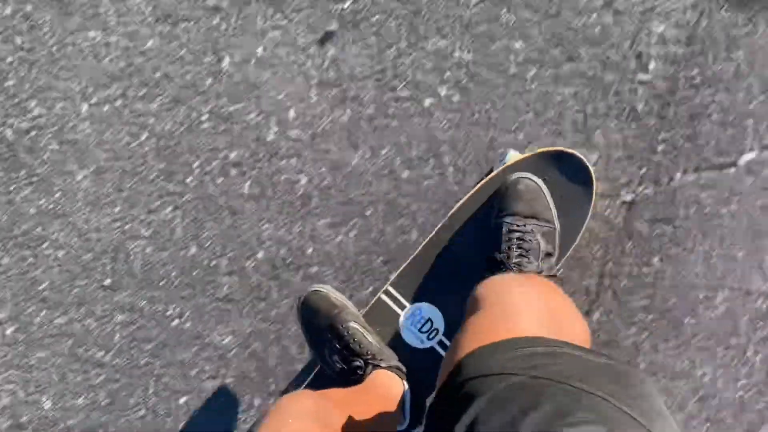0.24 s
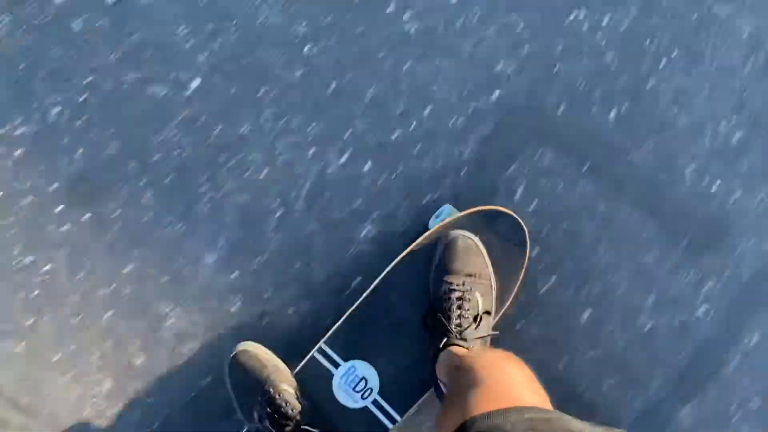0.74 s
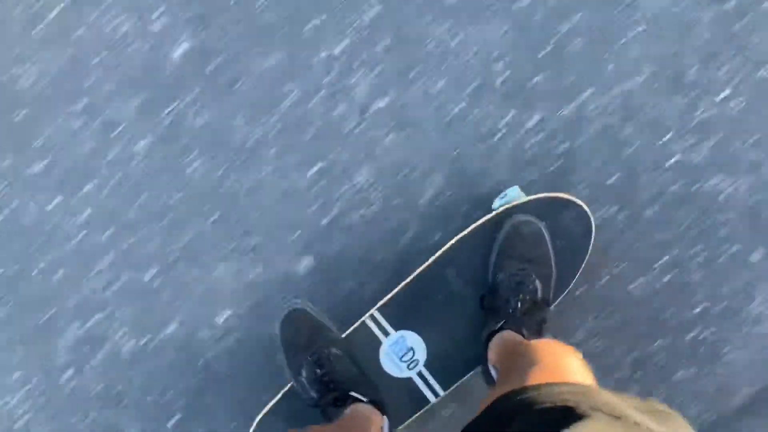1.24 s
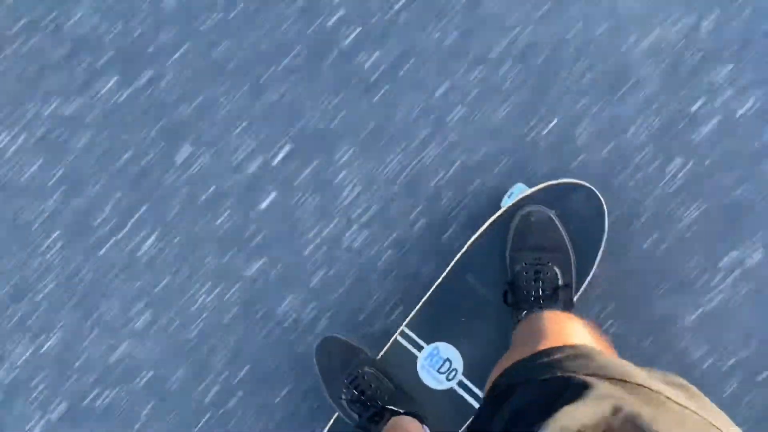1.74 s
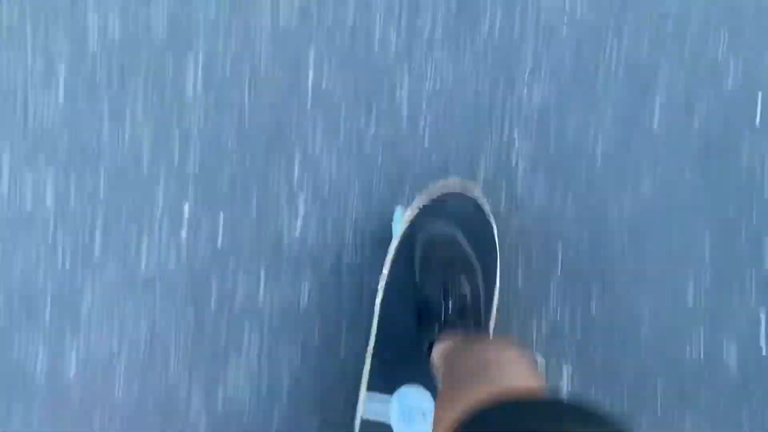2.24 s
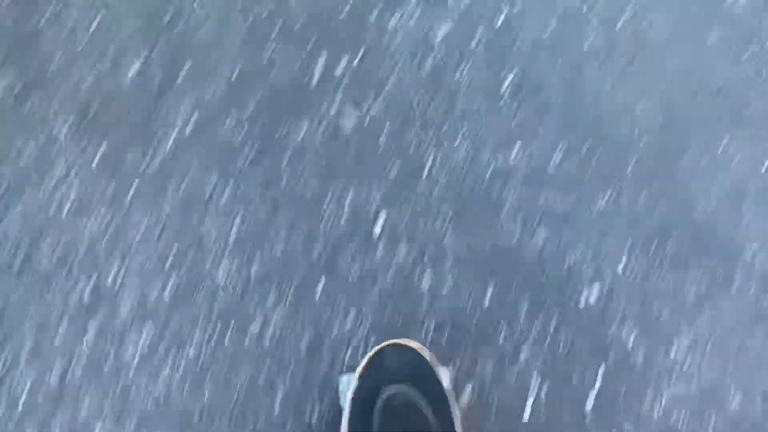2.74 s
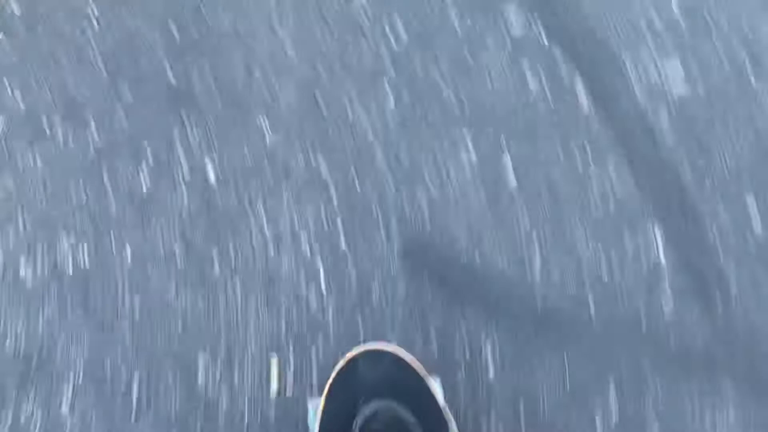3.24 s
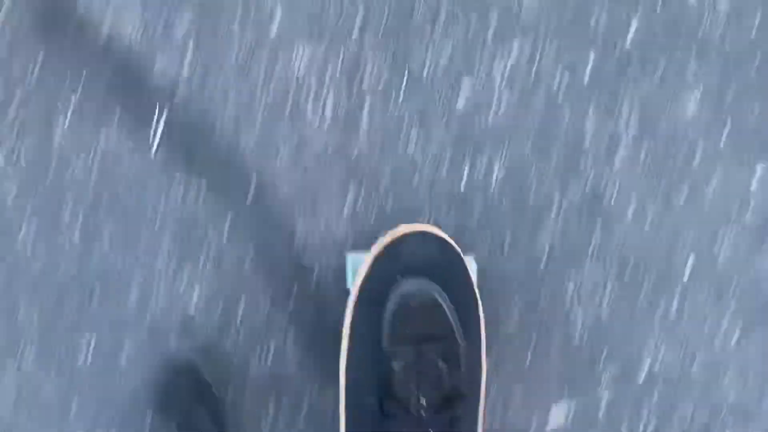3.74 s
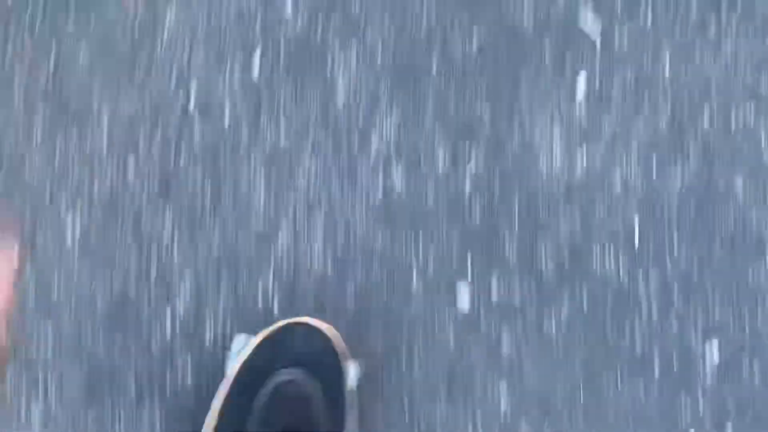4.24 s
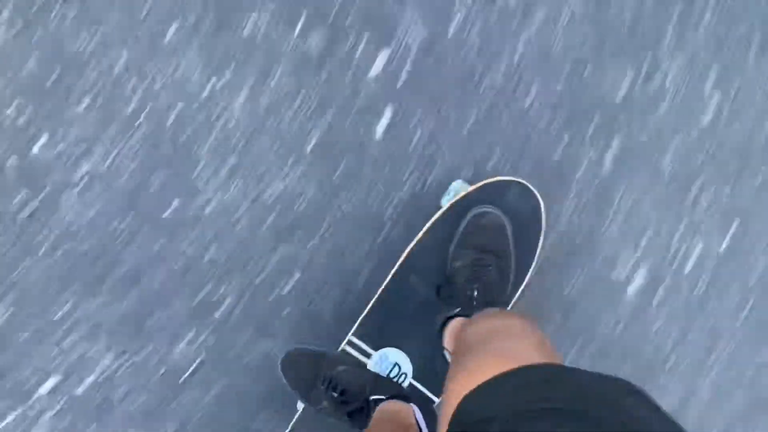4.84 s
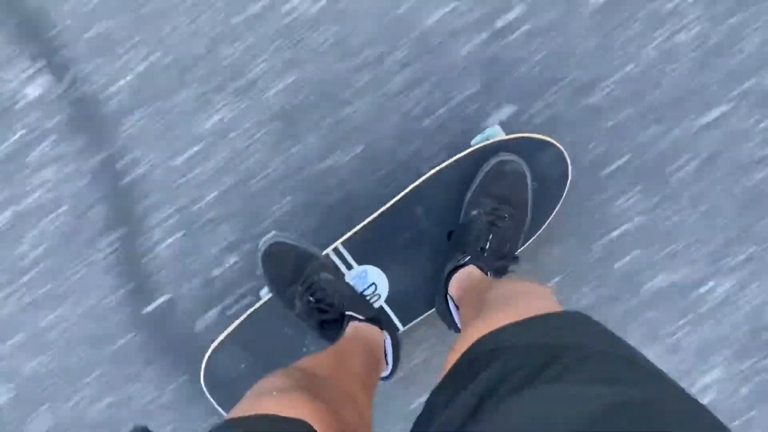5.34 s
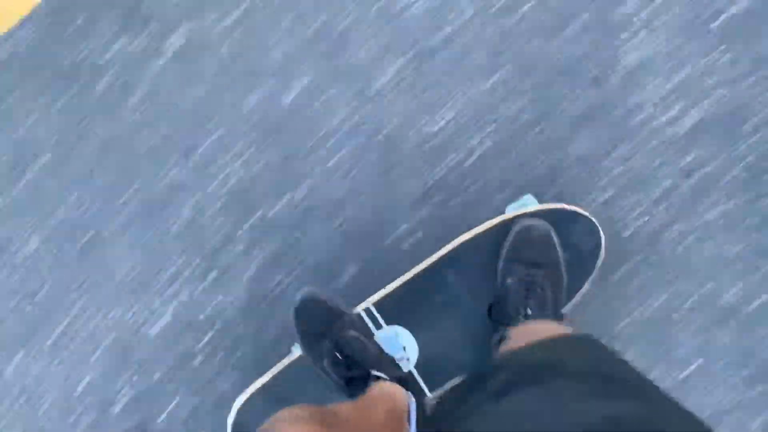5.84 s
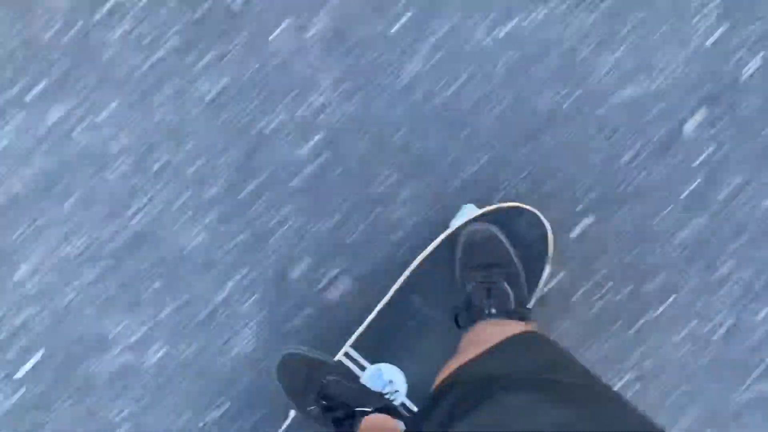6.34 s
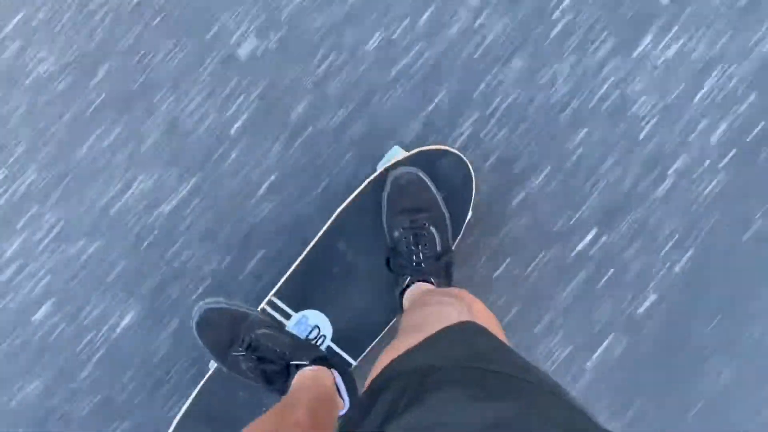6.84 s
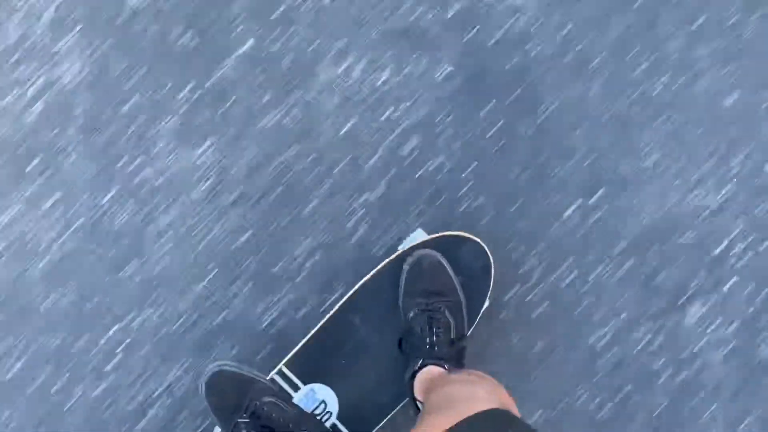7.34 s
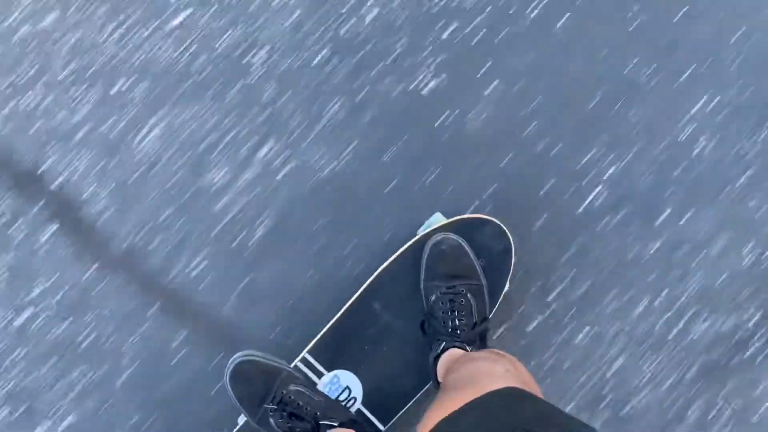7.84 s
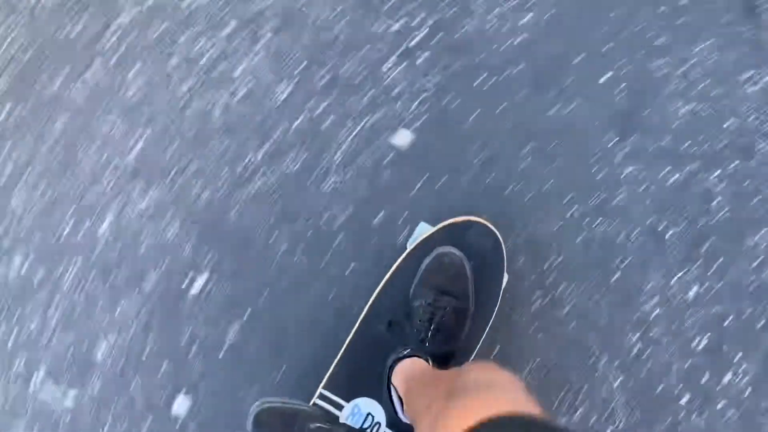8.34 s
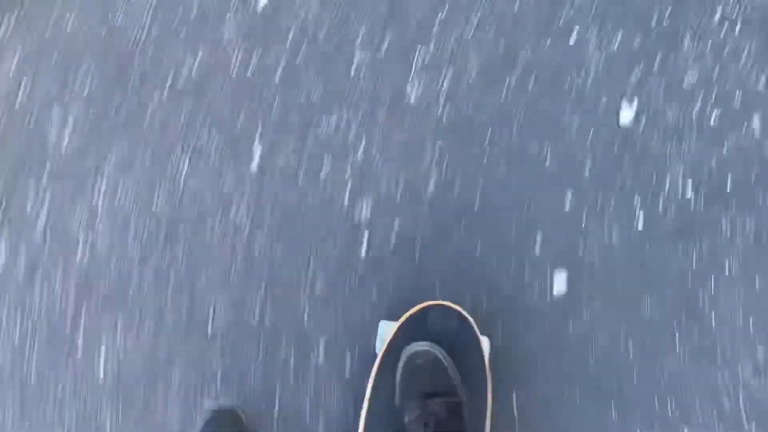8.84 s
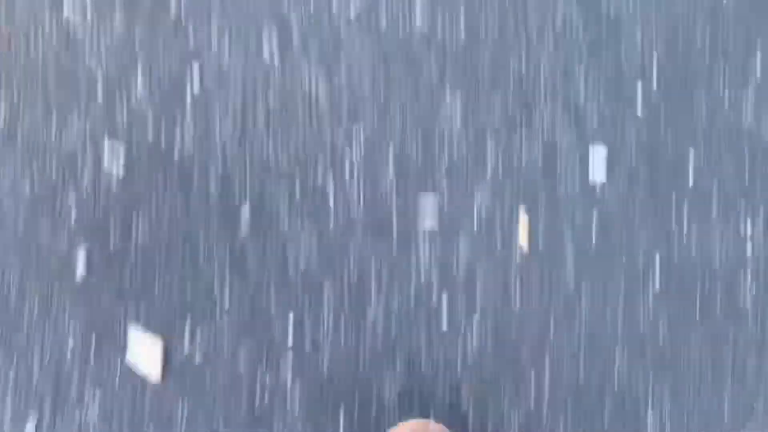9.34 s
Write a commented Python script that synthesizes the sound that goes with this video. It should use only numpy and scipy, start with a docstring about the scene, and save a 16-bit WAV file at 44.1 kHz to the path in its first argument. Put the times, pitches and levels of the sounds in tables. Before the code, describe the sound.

Skateboard wheels rumble and crackle over rough asphalt, with hollow woody knocks at cracks, shoe scrapes during pushes, and light wind buffeting close up.

```python
"""Longboard on rough asphalt

A longboard rolls over rough asphalt, heard at a two-port microphone in the rider's hand. Road stones drive the
resonances of deck and wheels and click under the tread; cracks, pebbles and a foot knock, and a shoe scrapes
the road. These are shaped noise and damped sines. Low-frequency noise makes the air's buffeting, higher noise
its hiss, and gliding sines a low drone that comes and goes."""
import sys
import numpy as np
from scipy import signal
from scipy.fft import rfft, irfft, next_fast_len
from scipy.io import wavfile
from scipy.ndimage import uniform_filter1d, map_coordinates

SR = 44100
rng = np.random.default_rng(int(sys.argv[2]) if len(sys.argv) > 2 else 0)


def transcribe(u):
    """Save the signal u as a 16-bit wav file named by the first command-line argument.

    u: samples, shape (n,) or (channels, n), limited to [-1, 1]; the rate is SR.
    q: integer samples, one column per channel.
    """
    v = np.clip(np.atleast_2d(u).T, -1, 1)
    q = np.round(v * 32767).astype(np.int16)
    wavfile.write(sys.argv[1], SR, q)


N = 422478

# Spectrum of the low road rumble. Each row: frequency in Hz, relative density in dB per Hz.
RUMBLE_SPECTRUM = [(30, -28), (70, -18.5), (130, -2), (220, 1), (330, 0.5), (460, -2), (720, -9.5),
                   (850, -26.5), (1100, -25.5), (1600, -37.5), (4000, -40.5), (16000, -100)]
# Spectrum of the grit's crackle. Each row: frequency in Hz, relative density in dB per Hz.
GRIT_SPECTRUM = [(300, -53), (800, 5), (1300, 3.5), (1700, 4), (1930, 0.5), (2100, 6), (2700, 4.5),
                 (3400, -2.5), (4000, -3), (5000, -20), (9000, -26.5), (16000, -92)]
# Spectrum of the fine grit in the treble. Each row: frequency in Hz, relative density in dB per Hz.
FINE_SPECTRUM = [(1000, -76), (3000, 6), (4400, 3), (5600, 6), (6400, 3.5), (6850, 6.5), (7700, 1.5),
                 (9000, 0.5), (10100, 3.5), (10900, -5), (12400, -2), (14300, -7), (16000, -3)]
# Spectrum of rubbing, also of the woody rattle. Each row: frequency in Hz, relative density in dB per Hz.
SCRAPE_SPECTRUM = [(200, -30), (500, -6), (730, 13.5), (860, -0.5), (1050, 5.5), (1300, -0.5), (1700, 0),
                   (1930, -8.5), (2060, -5), (2300, -5.5), (3500, -18), (7000, -19.5), (16000, -31.5)]


def amp(db):
    """The decibel law: level in dB to amplitude ratio."""
    return np.exp(np.asarray(db) * (np.log(10) / 20))


def unit(x):
    """Normalisation by mean power: scale to rms 1."""
    return x / np.sqrt(np.mean(x ** 2) + 1e-20)


def along(points, hz):
    """Interpolation of (Hz, value) points on a logarithmic frequency axis."""
    f, v = np.transpose(points)
    return np.interp(np.log(hz + 1), np.log(f + 1), v)


def curves(rows):
    """Linear interpolation in time: one value per sample for each column after the time."""
    s, *cols = np.transpose(rows)
    return [np.interp(np.arange(N) / SR, s, c) for c in cols]


def wobble(rate):
    """Slow random modulation: a smooth curve through normal random knots, rate of them a second."""
    coarse = np.arange(0, N, 64)
    knots = rng.standard_normal(int(N * rate / SR) + 4)
    smooth = map_coordinates(knots, [coarse * rate / SR])
    return np.interp(np.arange(N), coarse, smooth)


def plateau(s, length, edge_s):
    """Trapezoidal envelope: rises to 1 by time s, holds for length, and sinks again."""
    corners = [s - edge_s, s, s + length, s + length + edge_s]
    return np.interp(np.arange(N) / SR, corners, [0, 1, 1, 0])


def filtered(x, response):
    """Linear filtering: the spectrum of x times a complex response of frequency."""
    m = 2 * next_fast_len(N // 2 + 8192)
    return irfft(rfft(x, m) * response(np.fft.rfftfreq(m, 1 / SR)), m)[..., :N]


def coloured(x, spectrum):
    """Minimum-phase (causal) filter with the given spectrum, keeping the power of white noise."""
    half = 8192
    gain = unit(amp(along(spectrum, np.fft.rfftfreq(2 * half, 1 / SR))))
    cepstrum = irfft(np.log(gain))
    # folding the cepstrum onto positive times makes the phase minimal
    folded = np.r_[cepstrum[0], 2 * cepstrum[1:half], np.zeros(half)]
    kernel = irfft(np.exp(rfft(folded)))
    return signal.oaconvolve(x, kernel[:half])[:N]


def patchy(x, depth_db):
    """Spectral modulation: small patches of random gain in time and pitch keep the colour changing."""
    z = signal.stft(x, nperseg=512)[2]
    field = uniform_filter1d(rng.standard_normal(z.shape), size=3, axis=0)
    field = uniform_filter1d(field, size=7, axis=1)
    return unit(signal.istft(z * amp(depth_db * unit(field)), nperseg=512)[1][:N])


def add(track, s, sound):
    """Superposition: mix a sound into a track at time s."""
    part = track[max(round(s * SR), 0):][:len(sound)]
    part += sound[:len(part)]


def treads(rate, spread_db, cap):
    """Random point process of stone contacts: loosely even in spacing, sizes scattered in dB."""
    count = int(1.2 * rate * N / SR)
    at = np.cumsum(rng.gamma(3, SR / rate / 3, count)).astype(int)
    size = amp(spread_db * np.minimum(rng.standard_normal(count), cap))
    return np.bincount(at, size, N)[:N]


def crunch(contacts, t60, bed):
    """Modulated noise: each contact is a decaying burst, rounded by the soft tread, over an even bed."""
    energy = signal.lfilter([1], [1, -amp(-120 / (t60 * SR))], contacts ** 2)
    energy = np.convolve(energy, signal.get_window("hann", 44), "same")
    return unit(np.sqrt(abs(energy / energy.mean()) + bed) * rng.standard_normal(N))


def burst(rise_s):
    """Impact transient of one stone: swells for rise_s, dies with a faint tail, fairly even in colour."""
    t = np.arange(512) / SR
    u = t / rise_s
    tail = .045 * np.exp(-t / .003) * (1 - np.exp(-u))
    shape = u * np.exp(-u) + tail
    z = rfft(shape * rng.standard_normal(len(t)))
    # the root of the magnitudes evens out the spectrum
    click = irfft(z / np.sqrt(abs(z))) * shape ** .2
    return click / np.linalg.norm(click)  # energy 1


def ticks(contacts, rise_s, bed, count=10):
    """Convolution of contacts with impacts: each gives one of several clicks, over an even bed of noise."""
    kind = rng.integers(count, size=N)
    clicks = sum(signal.oaconvolve(contacts * (kind == k), burst(rise_s))[:N] for k in range(count))
    return unit(unit(clicks) + np.sqrt(bed) * rng.standard_normal(N))


def resonances(modes, hz):
    """Modal superposition: summed second-order (Hz, width Hz, dB) resonances of alternating sign."""
    total = 0
    for k, (centre, width, db) in enumerate(modes):
        damping = 1j * hz * width
        total = total + amp(db) * (-1) ** k * damping / (centre * centre - hz * hz + damping)
    return total


def deck(hz):
    """Modal response of the board, low-passed by the soft wheels."""
    # Resonances of the deck. Each row: frequency in Hz, width in Hz, level in dB before the wheels' filter.
    deck_modes = [(473, 153, -4), (598.7, 95, 1), (685.6, 97, -8.5)]
    wheels_db = [(100, -35), (400, -2.5), (720, 1.0), (860, -4), (1050, -12), (1400, -25.0), (4000, -30)]
    return resonances(deck_modes, hz) * amp(along(wheels_db, hz))


def singing(hz, width_hz):
    """Narrow-band noise: a damped complex resonator shifted to a pitch that may drift, rms 1."""
    pole = np.exp(-np.pi * width_hz / SR)
    noise = rng.standard_normal(N) + 1j * rng.standard_normal(N)
    swell = signal.lfilter([1], [1, -2 * pole, pole ** 2], noise)
    phase = 2 * np.pi * np.cumsum(hz * np.ones(N)) / SR
    return unit((swell * np.exp(1j * phase)).real)


def wheel_song():
    """Resonance of the wheels: narrow-band noise at a drifting lower pitch and a fixed upper one."""
    # Lower resonance of the wheels. Each row: time in seconds, frequency in Hz.
    wheel_pitch = [(0, 1099), (1.5, 1119), (3.5, 1000), (5, 1047), (7, 1021), (9.58, 998)]
    wheel_hz, = curves(wheel_pitch)
    return singing(wheel_hz, width_hz=200) + amp(-11) * singing(2065, width_hz=150)


def rolling():
    """Roughness excitation: the same stones ring the deck and crackle at the tread; coarse road lifts both."""
    # How hard the road shakes the board. Each row: time in seconds, then relative levels in dB of
    # deck ring, low rumble, grit and fine grit.
    road_levels = [(0.0, -24.5, -25, -47, -54), (0.16, -21, -30, -52, -53), (0.36, -26, -27, -50, -51.5),
                   (0.6, -26, -27.5, -47, -50), (1.0, -28, -26, -54, -50), (1.42, -25.5, -29, -48, -47.5),
                   (1.8, -22, -29.5, -43.5, -46), (2.3, -26, -33.5, -52.5, -60),
                   (2.8, -30.5, -38.5, -54, -54.5), (3.0, -35, -36.5, -47, -54),
                   (3.35, -31.5, -32, -48.5, -46.5), (3.76, -24.5, -24.5, -42, -48.5),
                   (4.2, -28, -23, -48.5, -48.5), (4.62, -18, -29, -44.5, -45),
                   (5.15, -20.5, -23, -47, -50.5), (5.8, -22.5, -24.5, -51.5, -51.5),
                   (6.1, -24.5, -26.5, -57, -53), (6.6, -25.5, -27.5, -54, -55.5),
                   (7.1, -27, -28.5, -49, -51.5), (7.84, -28, -28.5, -50.5, -50),
                   (8.28, -26, -34.5, -53.5, -56), (8.66, -38.5, -31, -55.5, -49),
                   (9.58, -64, -31.5, -55, -47.5)]
    # Stretches of coarser asphalt. Each row: start in seconds, length in seconds, extra grit in dB.
    coarse_stretches = [(0.063, 0.399, 14), (0.594, 0.12, 4.5), (1, 0.14, 6), (1.264, 0.12, 5),
                        (1.57, 0.22, 6), (1.934, 0.078, 4.5), (2.154, 0.14, 6.5), (2.447, 0.14, 8.5),
                        (3.863, 0.014, 6), (4.556, 0.37, 1), (4.752, 0.25, 3.5), (5.386, 0.072, 9),
                        (5.534, 0.14, 1.5), (6.178, 0.016, 13.5), (6.314, 0.05, 10), (6.73, 0.18, 4.5),
                        (7.24, 0.28, 4), (7.613, 0.32, 6), (8.053, 0.18, 4.5), (8.855, 0.033, 4)]
    # How strongly the wheels ring. Each row: time in seconds, relative level in dB.
    wheel_levels = [(0, -36.5), (.7, -40), (1.3, -42.5), (1.7, -34), (2.3, -44), (3.3, -46), (3.9, -34),
                    (4.6, -33.5), (5.1, -37.5), (6.5, -39.5), (7.8, -40.5), (8.5, -49), (9.58, -46)]
    patch_edge_s = 0.026  # the wheels roll onto or off a stretch
    uneven_db, heave_db = 0.9, 1.5  # random unevenness of the grit and of the rumble
    deck_share, fine_share = 0.27, 0.78  # dB of ring and of fine grit per dB of extra grit
    click_rise_s = .00035

    deck_db, rumble_db, grit_db, fine_db = curves(road_levels)
    wheel_db, = curves(wheel_levels)
    patch_db = sum(db * plateau(s, length, patch_edge_s) for s, length, db in coarse_stretches)
    patch_db = patch_db + uneven_db * wobble(9)
    deck_db = deck_db + deck_share * patch_db - 1.43
    wheel_db = wheel_db + deck_share * patch_db - 5.0
    rumble_db = rumble_db + heave_db * wobble(10) + 1.5
    grit_db = grit_db + patch_db + 2.5
    fine_db = fine_db + fine_share * patch_db - 2.0

    stones = treads(rate=270, spread_db=5, cap=1.0)
    texture = rng.standard_normal(N)
    ring = unit(filtered(unit(stones) + 1.22 * texture, deck))
    rumble = unit(coloured(crunch(stones, t60=0.11, bed=0.56), RUMBLE_SPECTRUM))
    # on quiet, smooth asphalt the single ticks sink into an even rustle
    smooth = amp(-.8 * (grit_db + 41.5))
    grit = coloured(ticks(stones, click_rise_s, bed=0.14 * smooth), GRIT_SPECTRUM)
    # only some stones are sharp enough to tick in the treble
    sharp = stones * amp(4.5 * np.clip(rng.standard_normal(N), -2, 1.5))
    fine = coloured(ticks(sharp, click_rise_s, bed=0.17 * smooth), FINE_SPECTRUM)
    # the stones lie in clusters, and their colour keeps changing
    cluster = np.clip(wobble(20), -2, 1.3)
    grit = amp(1.2 * cluster) * patchy(grit, depth_db=1.8)
    fine = amp(3.0 * cluster) * patchy(fine, depth_db=3.2)
    crackle = amp(grit_db + 1.5) * grit + amp(fine_db) * fine
    return amp(deck_db) * ring + amp(rumble_db) * rumble + amp(wheel_db) * wheel_song() + crackle


def hiss():
    """Flow noise: faster riding draws a soft, smooth hiss from the air."""
    # Spectrum of the hiss. Each row: frequency in Hz, relative density in dB per Hz.
    hiss_spectrum = [(2000, -15), (5000, 0), (7000, 5.5), (10000, -4), (10900, -16), (12500, 4),
                     (14300, -2), (16000, -1.5)]
    # Strength of the airflow's hiss. Each row: time in seconds, relative level in dB.
    airflow = [(0, -68), (2.6, -78), (3.4, -51), (5, -40.5), (6.5, -61), (7.2, -46), (8.3, -45), (8.7, -42),
               (9.58, -51)]
    level_db, = curves(airflow)
    return amp(level_db - 13.5) * coloured(rng.standard_normal(N), hiss_spectrum)


def wind():
    """Turbulent pressure at the microphone: gusts over a light breeze, only partly coherent between ports."""
    # Gusts. Each row: peak time in seconds, half width (to 1/e) in seconds, relative level in dB.
    gust_rows = [(2.1, 0.09, -33), (2.84, 0.018, -26), (2.945, 0.04, -27), (3.44, 0.022, -20),
                 (3.5, 0.028, -16), (3.56, .03, -24), (3.85, 0.41, -30), (4.25, 0.06, -22),
                 (4.36, .035, -20), (5.67, 0.037, -26.5), (6.12, 0.19, -23), (9.4, 0.12, -33)]
    # Spectrum of the buffeting. Each row: frequency in Hz, relative density in dB per Hz.
    buffet_spectrum = [(15, -34), (30, -23), (48, -2), (70, 0.5), (105, 1), (170, -9), (400, -32),
                       (2000, -80)]
    breeze_db, lumpy_db = -34.5, 2.4  # relative level between the gusts, and random unevenness
    t = np.arange(N) / SR
    level = amp(breeze_db)
    for s, width, db in gust_rows:
        level = level + amp(db) * np.exp(-np.minimum(((t - s) / width) ** 2, 20))

    def buffeting():
        """Amplitude-modulated low-frequency noise."""
        return unit(amp(lumpy_db * wobble(18)) * coloured(rng.standard_normal(N), buffet_spectrum))
    shared, apart = buffeting(), buffeting()
    return amp(-3.0) * level * (shared + amp(-10.5) * apart * np.array([[1], [-1]]))


def knocks():
    """Impulse response of damped modes: a wheel drops over an edge, or a foot lands, with a ring, a thud and a
    woody rattle."""
    # Knocks from wheels hitting cracks and pebbles, and from the rider's foot landing. Each row: time in
    # seconds, # ring level in dB, ring frequency in Hz, thud level in dB.
    knock_rows = [(0.0245, -7, 573, -17), (.179, -8, 574, -15), (0.2431, -3, 540, -13),
                  (.3024, -7.5, 570, -18), (.378, -11, 570, -29), (.432, -6, 577, -21),
                  (0.444, -4, 567, -14), (.787, -16, 560, -24), (1.536, -6, 604, -9.5),
                  (1.617, -8, 590, -22), (1.6845, -5, 584, -15), (1.953, -11, 586, -32),
                  (1.978, -4, 528, -22), (2.175, -8.5, 570, -32), (2.1946, -8.5, 576, -22),
                  (2.2711, -10, 585, -20), (2.9527, -14, 480, -23), (3.6, 1.5, 612, -6),
                  (3.611, -4.5, 590, -24), (3.709, -9, 584, -2), (3.979, -5, 640, 0),
                  (4.0278, -3.5, 507, -11), (4.203, -3, 380, -4.5), (4.299, -9, 600, -17),
                  (4.3771, -8, 570, -14), (4.4693, -3, 580, -16), (4.506, 1.5, 625, -27),
                  (4.515, -2, 583, -24), (4.553, 1.5, 545, -1.5), (4.5595, -6, 540, -6),
                  (4.599, -0.5, 550, -8), (4.612, -4.5, 593, -7), (4.711, 3, 580, -6), (4.762, -9, 600, -8),
                  (4.8407, -11, 585, -20), (4.8675, -8, 554, -21), (4.8884, -6.5, 590, -18),
                  (4.9112, -10, 570, -12), (5.075, -5, 555, -28), (5.111, -8, 563, -8),
                  (5.1896, -11, 550, -24), (5.2395, -8, 567, -28), (5.3511, -4, 560, -25),
                  (5.391, -1, 574, -5), (5.419, -7, 587, -16), (5.437, -5, 575, -14), (5.791, -4, 543, -13),
                  (5.812, -6, 570, -16), (6.1952, -2, 537, -8), (6.2924, -8, 547, -15),
                  (6.345, -8, 620, -16), (6.359, -2, 504, -12), (6.3635, -5.5, 497, -7.5),
                  (6.8672, 1, 574, -11), (7.022, -3.5, 625, -10), (7.0275, -6.5, 713, -11),
                  (7.032, 3.5, 508, -4.5), (7.0365, -0.5, 455, -10), (7.6195, -10, 550, -18),
                  (7.635, -6, 490, -16), (7.808, -4, 497, -8), (7.972, -11, 554, -25),
                  (8.0812, -11.5, 556, -27), (8.8959, -7, 580, -21)]
    # Higher modes. Each row: frequency in Hz, mean level in dB against the thud, 60 dB decay time in seconds.
    upper_modes = [(800, -28.5, 0.0097), (984, -11, 0.015), (1350, -21, 0.014)]
    ring_t60, thud_hz, thud_t60 = 0.03, 266, 0.019
    rattle_db, rattle_t60 = -17.5, .04  # dB against the thud, s
    out, rattle, t = np.zeros(N), np.zeros(N), np.arange(SR // 8) / SR
    attack = 1 - np.exp(-t / 0.0008)

    def mode(hz, db, t60):
        """Exponentially damped sine."""
        return np.sin(2 * np.pi * hz * t) * amp(db - 60 * t / t60)

    for s, db, hz, thud_db in knock_rows:
        knock = mode(hz, db, ring_t60) + mode(thud_hz, thud_db, thud_t60)
        for mode_hz, mode_db, t60 in upper_modes:
            knock += mode(mode_hz, thud_db + mode_db + rng.normal(0, 2.8), t60)
        add(out, s, -attack * knock)
        decay = amp(thud_db + rattle_db - 60 * t / rattle_t60)
        add(rattle, s, attack * decay * rng.standard_normal(len(t)))
    return out + coloured(rattle, SCRAPE_SPECTRUM)


def snaps():
    """Brittle impact: single stones crack, sharply or with a short crush, each with its brightness and ring."""
    # The loudest grit and pebbles under the tread. Each row: time in seconds, rise in seconds,
    # crack level in dB, treble level in dB, ring level in dB, ring frequency in Hz.
    stone_snaps = [(0.062, 0.0009, -34, -52, -15, 2050), (0.0936, 0.0006, -38, -47, -19, 1960),
                   (0.1095, 0.0009, -30, -41, -11, 1940), (0.1259, 0.0005, -35, -48, -18, 1970),
                   (0.1403, 0.0005, -28, -50, -10, 2050), (0.1598, 0.00089, -29, -37, -15, 1960),
                   (0.194, 0.00067, -32, -42, -15, 1890), (0.2249, 0.0003, -28, -46, -27, 2780),
                   (0.2399, 0.0011, -25, -34, -16, 1490), (0.3061, 0.0007, -28, -42, -18, 1980),
                   (0.3267, 0.00046, -26, -33, -17, 2020), (0.377, 0.00033, -23, -34, -28, 1700),
                   (0.425, 0.0004, -25, -42, -26, 1980), (0.4473, 0.0005, -27, -40, -29, 2840),
                   (0.4747, 0.0005, -26, -42, -27, 2050), (0.5416, 0.00053, -24, -35, -25, 2110),
                   (0.5894, 0.00089, -29, -45, -33, 2190), (0.599, 0.00075, -37, -40, -21, 2900),
                   (0.675, 0.0004, -27, -34, -30, 2280), (0.685, 0.0005, -31, -38, -27, 2300),
                   (0.7419, 0.0007, -35, -44, -27, 2130), (0.8579, 0.0005, -36, -38, -37, 2300),
                   (1.0082, 0.00072, -36, -36, -22, 2560), (1.0645, 0.00099, -29, -33, -31, 2220),
                   (1.123, 0.00036, -33, -38, -35, 2370), (1.14, 0.00086, -33, -36, -35, 2050),
                   (1.3455, 0.00064, -40, -36, -30, 2390), (1.397, 0.0007, -32, -45, -30, 2420),
                   (1.4118, 0.0007, -35, -35, -34, 2390), (1.6023, 0.00051, -27, -38, -36, 2780),
                   (1.6352, 0.0008, -28, -32, -28, 2410), (1.6555, 0.0012, -30, -35, -15, 1470),
                   (1.727, 0.00059, -30, -43, -21, 2320), (1.8091, 0.00072, -29, -42, -21, 2330),
                   (1.8262, 0.0006, -35, -41, -28, 2330), (1.8802, 0.0005, -29, -47, -28, 2280),
                   (1.893, 0.0007, -35, -40, -32, 2300), (1.9206, 0.0012, -27, -36, -15, 2110),
                   (1.926, 0.0006, -30, -35, -27, 1640), (1.9792, 0.0007, -26, -38, -18, 2300),
                   (2.1422, 0.0005, -34, -48, -24, 2320), (2.1746, 0.00043, -34, -52, -21, 2120),
                   (2.1861, 0.00079, -32, -42, -21, 2200), (2.2717, 0.00071, -31.5, -47, -17, 2090),
                   (2.388, 0.00092, -35, -52, -28, 2480), (2.477, 0.00055, -41, -51, -24, 2180),
                   (2.5255, 0.00035, -50, -35, -42, 2260), (2.919, 0.00076, -41, -36, -14, 1480),
                   (2.9296, 0.0011, -31, -29, -13, 1740), (3.0726, 0.0007, -32, -37, -15, 1740),
                   (3.1145, 0.0011, -26, -38, -19, 2530), (3.189, 0.0008, -44, -39, -19, 1730),
                   (3.4329, 0.00059, -34, -38.5, -24, 1490), (3.6104, 0.00079, -45, -33, -27, 2430),
                   (3.6306, 0.00068, -47, -42, -23, 1446), (3.675, 0.00082, -37, -35.5, -23, 1440),
                   (3.7577, 0.0007, -28, -36, -13, 1460), (3.7651, 0.00063, -30, -35, -27, 1460),
                   (3.8144, 0.0012, -28, -37, -22, 1450), (3.8635, 0.0009, -26, -41, -15, 2680),
                   (3.8814, 0.00052, -28, -49, -17, 2430), (3.9789, 0.00053, -24.5, -34, -10, 1660),
                   (4.027, 0.00072, -31, -39, -17, 2230), (4.0321, 0.00052, -25.5, -34, -25, 1680),
                   (4.0466, 0.0005, -40, -41, -33, 2110), (4.3002, 0.0011, -29, -37, -18, 1460),
                   (4.38, 0.00074, -33, -32.5, -19, 1660), (4.4492, 0.00075, -24, -38, -26, 1460),
                   (4.5436, 0.00055, -21, -28.5, -12, 2380), (4.5522, 0.00062, -21, -35, -9, 2310),
                   (4.56, 0.00068, -24, -39, -10, 2200), (4.5948, 0.0008, -31, -37, -14, 2480),
                   (4.6104, 0.0006, -29, -34, -16, 1450), (4.6526, 0.00064, -30, -46, -11.5, 2480),
                   (4.669, 0.00059, -38, -26.5, -19, 1460), (4.6806, 0.00084, -22, -32, -20, 2480),
                   (4.8415, 0.0005, -30, -38, -33, 1610), (4.9788, 0.00075, -30, -36, -23, 2370),
                   (5.2305, 0.0005, -30.5, -37.5, -24, 1730), (5.2965, 0.00055, -33, -42, -32, 1660),
                   (5.3954, 0.00087, -31, -44, -21, 2070), (5.403, 0.00059, -35, -42, -18, 2120),
                   (5.4353, 0.00081, -26, -35, -27, 2110), (5.5752, 0.0005, -31, -36, -22, 1590),
                   (5.6794, 0.00076, -35, -34, -23, 2110), (5.6877, 0.00055, -33, -36, -41, 2300),
                   (5.7359, 0.0005, -35, -37, -30, 1680), (5.941, 0.00034, -50, -37, -51, 2650),
                   (6.1804, 0.00099, -36, -53, -35, 1460), (6.1936, 0.0004, -24, -32, -20, 2670),
                   (6.345, 0.0014, -28, -38, -12.5, 1820), (6.3675, 0.00054, -30, -44, -27, 2300),
                   (6.763, 0.00086, -32, -39, -25, 3140), (6.7738, 0.00071, -48, -38, -41, 2050),
                   (6.8656, 0.001, -25, -31.5, -9.5, 2150), (7.02, 0.0015, -24.5, -33, -14, 1390),
                   (7.228, 0.00095, -34, -43, -36, 2130), (7.6352, 0.00064, -27, -33.5, -17, 1660),
                   (8.0565, 0.0006, -38, -44, -36, 2130), (8.8713, 0.0006, -37, -45, -22, 2520)]
    ring_t60 = .014
    body, treble, clack, t = np.zeros(N), np.zeros(N), np.zeros(N), np.arange(SR // 30) / SR
    size = np.sqrt(.003 * SR)  # crack and treble levels are rms over 3 ms
    for s, rise_s, db, treble_db, ring_db, hz in stone_snaps:
        add(body, s, size * amp(db) * burst(rise_s))
        add(treble, s, size * amp(treble_db) * burst(rise_s))
        # a random walk of the phase roughens the ring
        phase = 2 * np.pi * hz * t + 0.09 * np.cumsum(rng.standard_normal(len(t)))
        envelope = amp(ring_db - 60 * t / ring_t60) * (1 - np.exp(-t / 0.0005))
        add(clack, s, envelope * np.sin(phase))
    return coloured(body, GRIT_SPECTRUM) + coloured(treble, FINE_SPECTRUM) + clack


def drone():
    """Additive synthesis: low tones in fixed frequency ratios come in spells, glide together and waver."""
    # Spells of drone. Each row: start in seconds, length in seconds, first and last mean pitch in Hz,
    # relative level in dB.
    spells = [(0.352, 0.95, 79, 82.9, -37.5), (1.305, 1.94, 69, 67.5, -43), (4.823, 0.8, 72, 76.9, -39),
              (5.82, 0.51, 79.9, 76.1, -32), (6.567, 2.55, 64.67, 64, -34), (9.301, 0.25, 77.3, 97.6, -32)]
    fade_s, waver_db = 0.13, 1.3
    glide, level = [], np.zeros(N)
    for s, length, first_hz, last_hz, db in spells:
        glide += [(s, first_hz), (s + length, last_hz)]
        level += amp(db) * plateau(s, length, fade_s)
    hz, = curves(glide)
    phase = 2 * np.pi * np.cumsum(hz * (1 + 0.006 * wobble(6))) / SR
    upper = amp(-6 + wobble(2)) * np.sin(1.6 * phase)
    upper += amp(-16 + 4 * wobble(2)) * np.sin(1.4 * phase)
    return level * amp(4.0 + waver_db * wobble(4.6)) * (np.sin(phase) + upper)


def flutter():
    """Antiphase pressure: air eddies between the two ports push them in opposite ways."""
    # Eddies as the rider leans over to push. Each row: start in seconds, length in seconds, level in dB.
    eddy_spells = [(2.45, 0.27, -35), (2.75, .1, -31), (2.92, 0.11, -27), (3.166, 0.29, -26),
                   (3.7, .1, -29), (3.97, 0.049, -29), (4.16, 0.17, -26)]
    # Spectrum of the eddies. Each row: frequency in Hz, relative density in dB per Hz.
    eddy_spectrum = [(40, -14), (110, -6), (180, -3), (300, -7), (600, -16), (2000, -60)]
    level = sum(amp(db) * plateau(s, length, edge_s=.06) for s, length, db in eddy_spells)
    return level * unit(coloured(rng.standard_normal(N), eddy_spectrum)) * np.array([[1], [-1]])


def ringing(drive, modes):
    """Forced resonance: a drive rings narrow modes; the bass below them stays dark."""
    def response(hz):
        bass_cut = 1 + (.75 * modes[0][0] / (hz + 1)) ** 6
        return resonances(modes, hz) / bass_cut
    return unit(filtered(drive, response))


def free_deck():
    """Reduced damping: while the rider pushes with one foot off, the deck sings in narrow resonances."""
    # Spells with one foot off. Each row: start in seconds, length in seconds, level in dB.
    free_spells = [(2.59, 0.32, -38), (2.96, .22, -27), (3.26, 0.3, -33.5), (3.66, 0.28, -25.5),
                   (8.38, 0.47, -40), (8.835, 0.11, -24.5), (8.96, 0.13, -34), (9.116, 0.61, -40)]
    # Resonances of the freer deck. Each row: frequency in Hz, width in Hz, relative level in dB.
    free_modes = [(609.7, 23.5, 4.5), (668, 38, -0.5), (747, 15, -7), (978, 32, -14), (1045, 29, -21),
                  (1370, 56, -24), (1700, 82, -35), (2050, 42, -18.5)]
    level = sum(amp(db) * plateau(s, length, 0.02) for s, length, db in free_spells)
    return level * ringing(rng.standard_normal(N), free_modes)


def scrapes():
    """Stick-slip friction: sole and tread rub in dense grains; weight on them thrums and rings the deck."""
    # Strokes on the road. Each row: start in seconds, length in seconds, then levels in dB of
    # scrape, low thrum and deck ring.
    strokes = [(2.907, 0.012, -32.5, -28.5, -30), (2.975, 0.025, -24.5, -42, -42),
               (3.08, 0.044, -29, -24.5, -36), (3.144, 0.04, -32.5, -47, -45),
               (3.723, 0.056, -27, -43, -50), (3.82, 0.088, -32.5, -32, -51),
               (3.956, 0.07, -33.5, -20.5, -43), (4.31, 0.23, -36, -26.5, -32),
               (4.458, 0.13, -34.5, -22, -26.5), (8.83, 0.095, -34.5, -25.5, -28.5),
               (8.95, 0.076, -34, -27, -50), (9.352, 0.017, -42, -32, -49), (9.407, 0.15, -43, -30, -56),
               (9.56, 0.06, -34, -29, -29)]
    rise_db_per_s, fall_db_per_s = 260, 140
    levels, t = np.zeros((3, N)), np.arange(N) / SR
    for s, length, *layers_db in strokes:
        before, after = np.clip(s - t, 0, 1), np.clip(t - s - length, 0, 1)
        stroke = amp(-rise_db_per_s * before - fall_db_per_s * after)
        levels = np.maximum(levels, np.outer(amp(layers_db), stroke))
    grains = ticks(treads(rate=480, spread_db=4, cap=1.1), rise_s=.0004, bed=0.15)
    catch = amp(2.4 * np.clip(wobble(70), -2, 1))  # the sole catches and slips
    rub = patchy(coloured(grains * catch, SCRAPE_SPECTRUM), depth_db=3.0)
    thrum = coloured(rng.standard_normal(N), RUMBLE_SPECTRUM)
    ring = unit(filtered(rng.standard_normal(N), deck))
    return np.sum(levels * [rub, thrum, ring], axis=0)


def ports(x, scatter_db, scatter_t60):
    """Interaural-like phase and level differences; the passing road scatters ever new echoes to each side."""
    # Phase between the microphone ports. Each row: frequency in Hz, lead of the left port in radians.
    port_lead = [(60, 0), (250, -0.3), (620, -0.75), (860, -0.3), (1130, -1.2), (1450, 0.3), (2350, 1.8),
                 (3050, 1.1), (4200, 2.6), (5200, 3.6), (6400, 6.1), (7500, 6.6), (8900, 9.4),
                 (10600, 12.3), (11600, 12.8), (13000, 15.7), (14800, 18.6), (16000, 18.9)]
    # Level between the ports. Each row: frequency in Hz, left minus right in dB.
    port_tilt = [(60, -1), (130, -1.5), (300, -1.5), (600, 1), (1300, -2.5), (2000, -2.5), (2600, 0.5),
                 (3600, -0.5), (8000, -0.5)]

    def response(hz):
        # half of each difference goes to either side
        left = np.exp(.5j * along(port_lead, hz)) * amp(.5 * along(port_tilt, hz))
        return np.array([left, 1 / left])
    pair = filtered(x, response)
    block = 4096
    window, t = signal.get_window("hann", block), np.arange(block // 2) / SR
    starts = np.arange(0, N - block, block // 2)
    pieces = window * x[starts[:, None] + np.arange(block)]
    for side in pair:
        # each overlapping piece gets its own decaying noise tail
        tails = rng.standard_normal((len(starts), len(t))) * amp(-60 * t / scatter_t60)
        tails *= amp(scatter_db) / np.linalg.norm(tails, axis=1, keepdims=True)
        for start, echo in zip(starts, signal.fftconvolve(pieces, tails, axes=1)):
            add(side, start / SR, echo)
    return pair


def scene():
    """Superposition of the board under the rider with the wind and drone around."""
    board = rolling() + free_deck() + scrapes() + knocks() + snaps()
    at_ports = ports(board + hiss(), scatter_db=-9.0, scatter_t60=0.05)
    return at_ports + wind() + flutter() + drone()


def record(dry):
    """Soft saturation and band limiting: the camera rounds the highest peaks and cuts the top treble."""
    top_hz, ceiling = 15950, .95
    rounded = dry / (1 + np.abs(dry / ceiling) ** 6) ** (1 / 6)
    return filtered(rounded, lambda hz: hz < top_hz)


dry = scene()
out = record(dry)
transcribe(out)
```